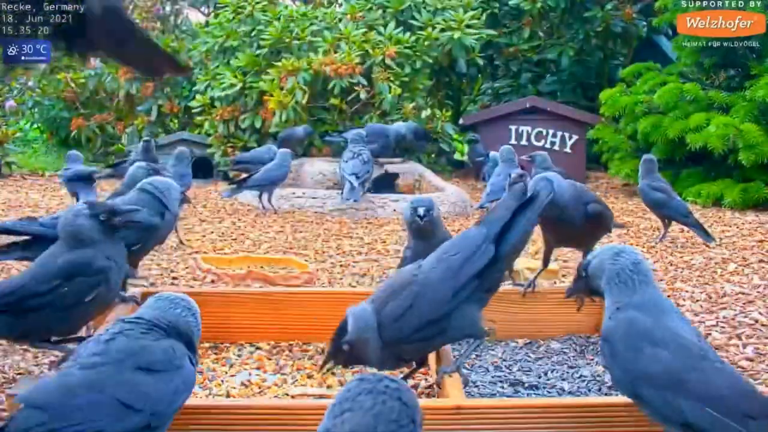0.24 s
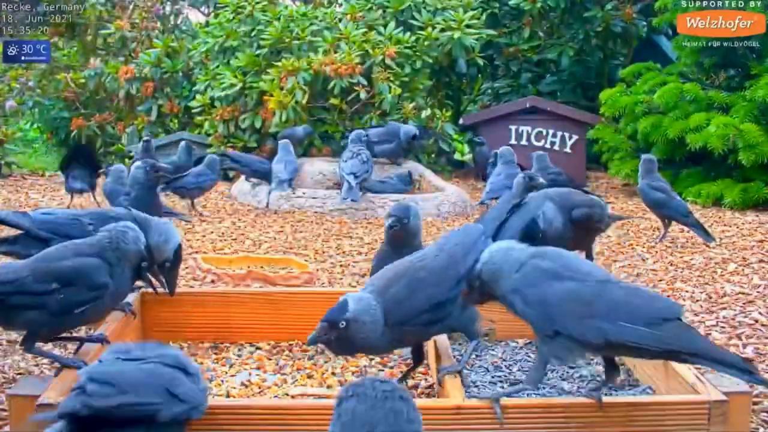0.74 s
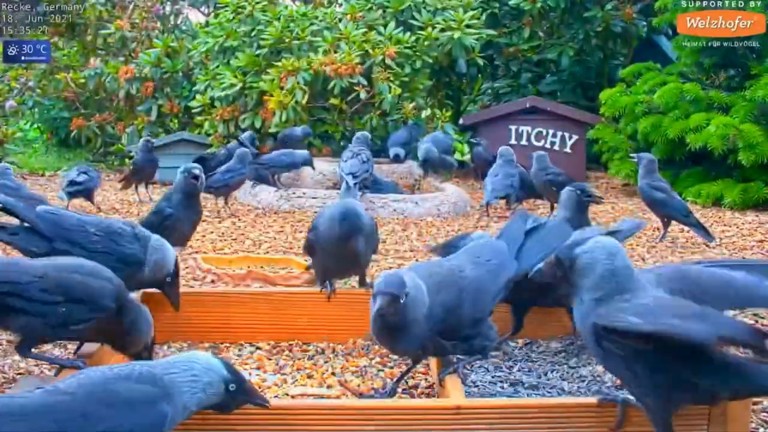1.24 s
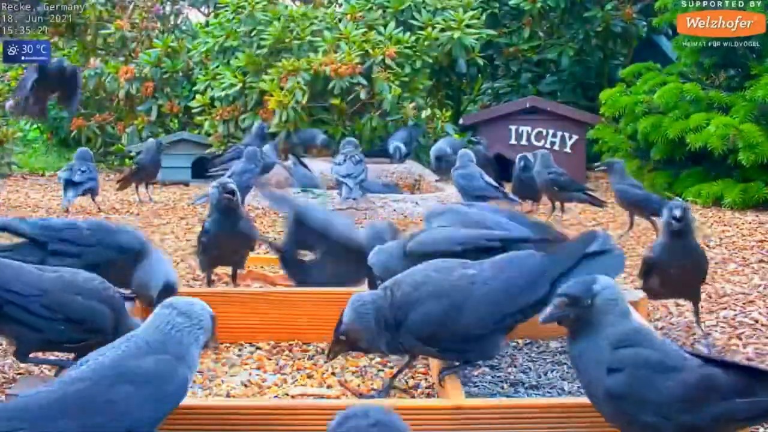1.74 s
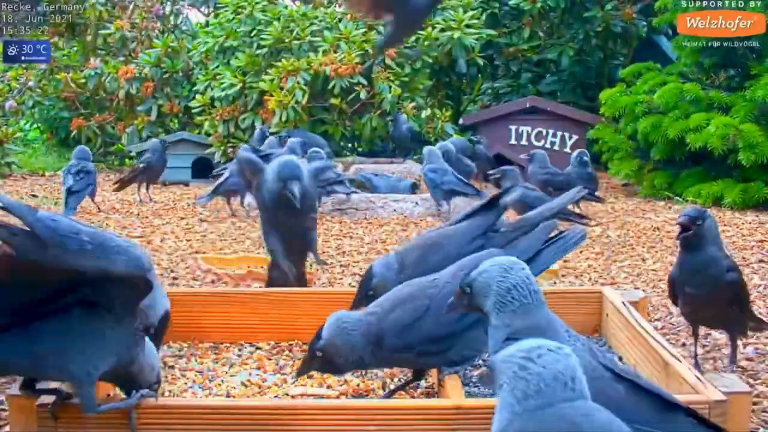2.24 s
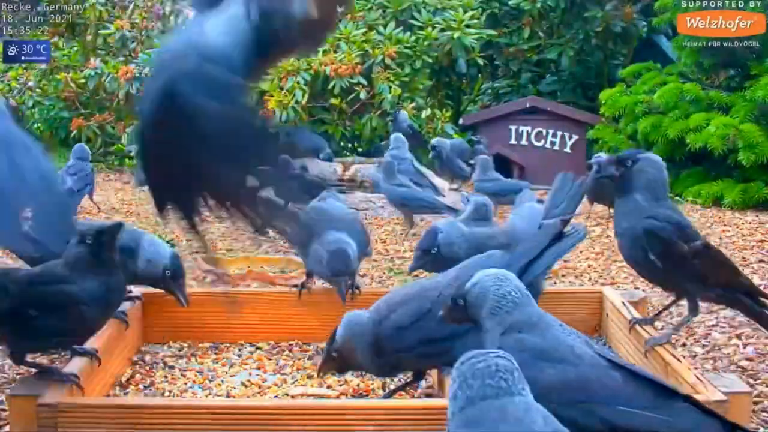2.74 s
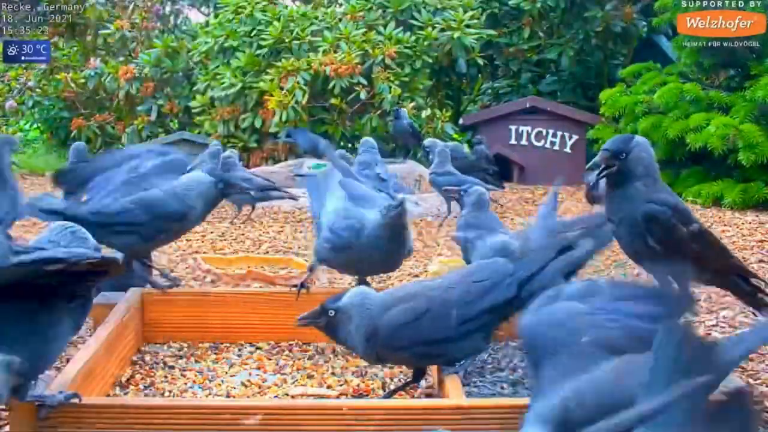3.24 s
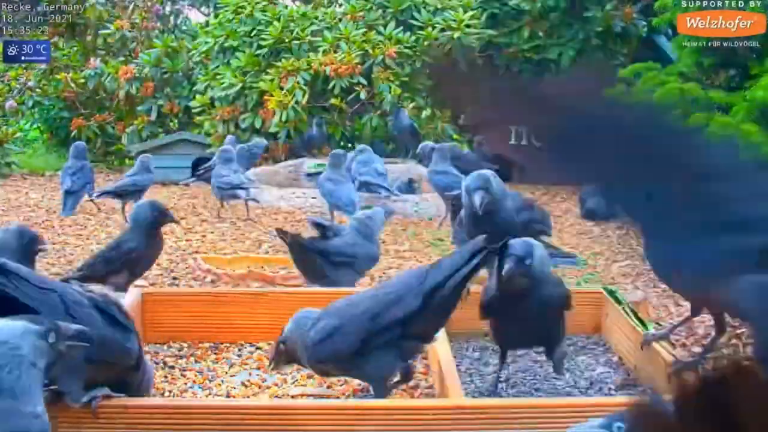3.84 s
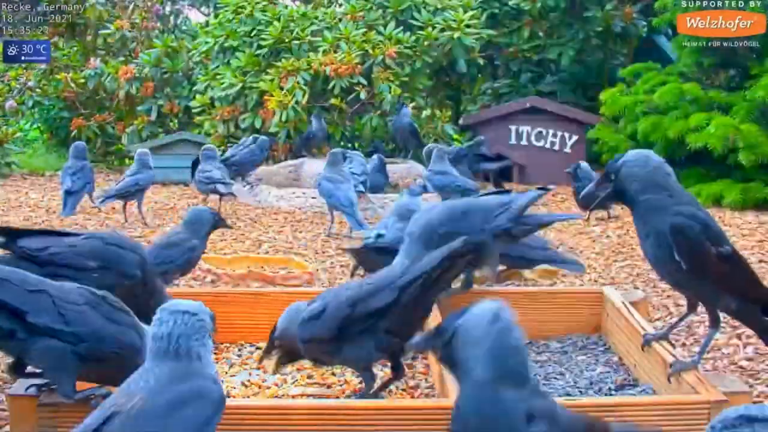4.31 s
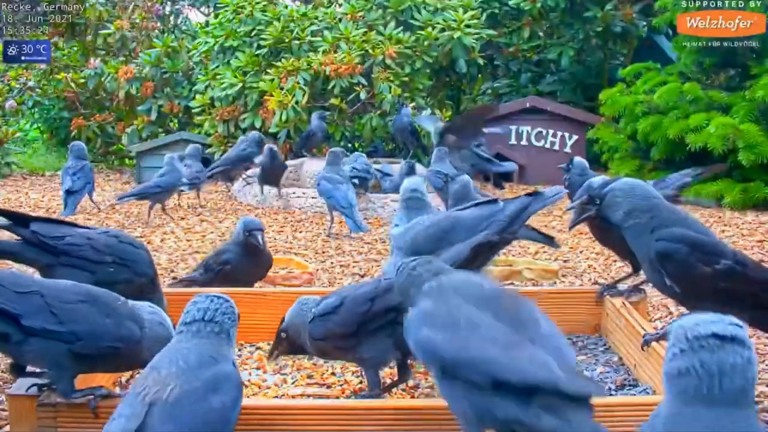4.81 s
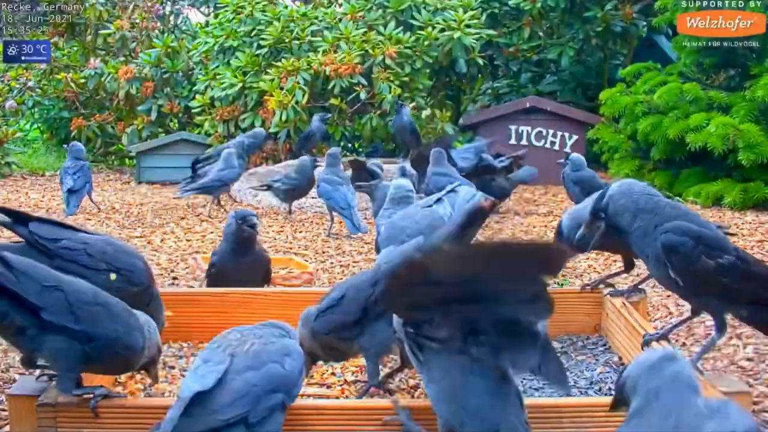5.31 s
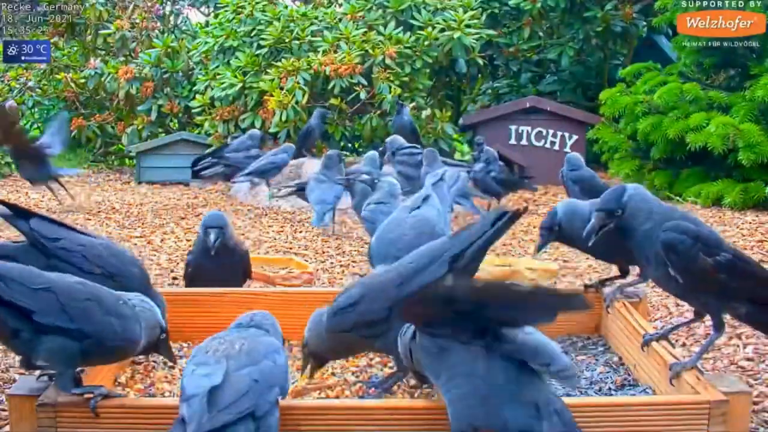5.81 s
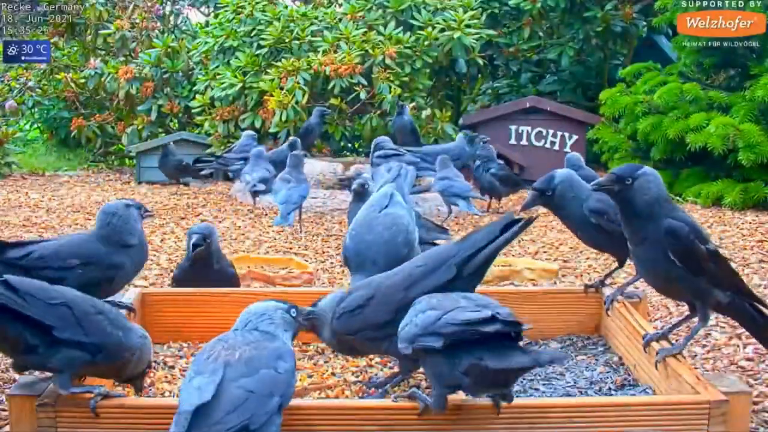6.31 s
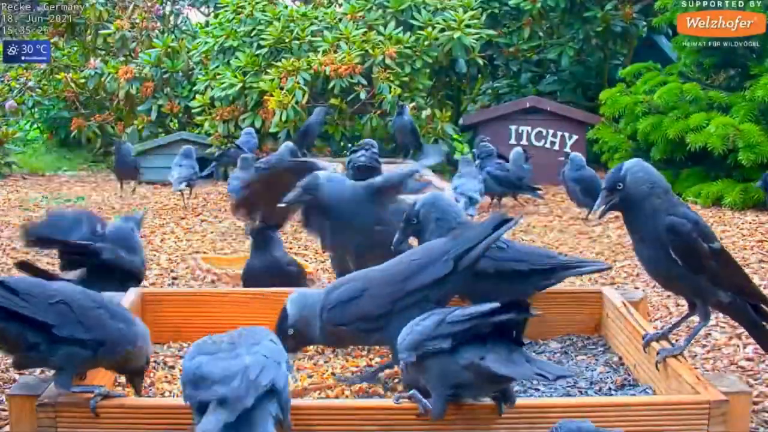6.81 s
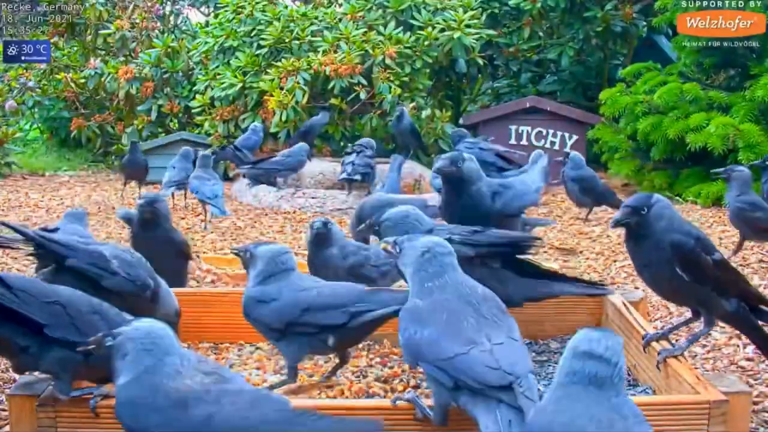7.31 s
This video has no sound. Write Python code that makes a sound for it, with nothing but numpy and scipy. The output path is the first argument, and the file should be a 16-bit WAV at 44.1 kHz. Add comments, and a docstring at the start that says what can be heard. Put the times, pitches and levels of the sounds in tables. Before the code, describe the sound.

Sharp, falling jackdaw calls burst out very close, some distorting, among pecks, scrapes, rattling seed and wing rustle at a wooden tray outdoors.

```python
"""Jackdaws at a feeding tray

Jackdaws crowd a wooden tray in a garden, and their nearest calls overload the microphone.
Each call is a short stack of harmonics, mostly falling, with some roughness and hiss.
Beaks and feet knock, scrape and rattle: short noise bursts and a ringing tray. Noise and small ticks
make the rustle of wings and gravel; gliding tones and narrow noise make the far small birds."""
import sys
import numpy as np
from scipy import signal
from scipy.fft import rfft, irfft, next_fast_len
from scipy.io import wavfile
from scipy.ndimage import uniform_filter1d

SR = 44100
rng = np.random.default_rng(int(sys.argv[2]) if len(sys.argv) > 2 else 0)


def voltage_ratio(decibels):
    """Convert decibels (scalar or array-like) to amplitude ratios, 20 dB per decade."""
    exponent = np.asarray(decibels, float) / 20
    return 10 ** exponent


def unload_wav(signal):
    """Save mono or channel-first audio to the path in sys.argv[1] as 16-bit WAV at rate SR, clipped to [-1, 1]."""
    wavfile.write(
        sys.argv[1],
        SR,
        np.round(np.clip(np.atleast_2d(signal).T, -1, 1) * 32767).astype(np.int16),
    )


N = 332955  # length in samples, about 7.55 s


def band(x, lo_hz, hi_hz):
    """Keep only the sound between two frequencies, scaled to rms 1."""
    y = signal.sosfilt(signal.butter(2, [lo_hz, hi_hz], "band", fs=SR, output="sos"), x)
    return y / np.std(y)


def walk(rate):
    """Wandering curve: random levels held 1 / rate s, smoothed twice, with a spread of 1."""
    hold = int(SR / rate)
    steps = np.repeat(rng.standard_normal(N // hold + 1), hold)
    y = uniform_filter1d(uniform_filter1d(steps, hold), hold)[:N]
    return y / np.std(y)


def grit(per_s, spread_db):
    """Single clicks of unequal size at random moments."""
    size_db = spread_db * np.minimum(rng.exponential(size=N), 3)
    return (rng.random(N) < per_s / SR) * rng.standard_normal(N) * voltage_ratio(size_db)


def add(out, start_s, sound):
    """Mix a sound in at its time."""
    i = int(start_s * SR)
    out[i:i + len(sound)] += sound[:len(out) - i]


# How the mouth colours the harmonics from the fourth up: [f/Hz, relative level/dB]
MOUTH_COLOUR = [(3000, 12), (4300, 5), (5600, 8.5), (7500, -3.5), (9000, -6.5), (15000, -17)]


def throat_and_mouth(hz, phase, throat, high_db, patchy, i):
    """Twelve harmonics: the throat resonance favours the lowest three, the mouth colours the rest."""
    mouth_hz, mouth_db = np.transpose(MOUTH_COLOUR)
    tone = np.zeros(len(i))
    for k in range(1, 13):
        uneven = patchy[i - 2000 * k]  # each harmonic comes and goes at its own moments
        if k <= 3:
            above = np.log2(k * hz / 1000) - throat
            slope_db = np.where(above > 0, 31, 27.5)  # dB per octave above and below the resonance
            away = np.hypot(above, .18) - .18  # octaves away, with a rounded peak
            gain = voltage_ratio(2.5 * uneven - slope_db * away)
        else:
            colour_db = np.interp(np.log(k * hz), np.log(mouth_hz), mouth_db)
            gain = voltage_ratio(high_db + 4 * uneven + colour_db)
        tone += gain * np.sin(k * phase + k * k)
    return tone


# One short curve per call, before a slight waver in pitch; the call at 4.459 s breaks into a low croak,
# which has its own curve from 4.492 s:
# [t/s, f/Hz of the pitch, effort level/dB, throat resonance/octaves above 1 kHz]
CALLS = [
    [(.093, 1003, -13.5, 2), (.106, 1011, -1, 0.75), (.116, 934, 0, 1.36), (.134, 742, -16, 0.43),
     (.16, 586, -28, -1.3)],
    [(.132, 965, -19, .9), (.15, 925, -27, 0.66), (.178, 800, -38, 0.83)],
    [(.773, 934, -0.5, 0.78), (.783, 861, -7.5, 1.04), (.793, 774, -5, 1.4), (.81, 690, -36, 2.3)],
    [(1.066, 1022, 4.5, 0.75), (1.078, 1014, -0.5, 0.84), (1.09, 978, 4.5, 0.82), (1.101, 877, -5, 0.66),
     (1.118, 685, -23, 0.74)],
    [(1.353, 1044, -19, 1.5), (1.366, 1028, -12.5, 1.2), (1.377, 998, -6.5, 1.4), (1.39, 942, -9, 0.51),
     (1.415, 880, -21, 0.47), (1.435, 870, -45, .6)],
    [(1.452, 1020, -39, 1), (1.465, 1120, -31, 0.99), (1.495, 960, -42, 1.2), (1.53, 760, -44, .6)],
    [(3.014, 1243, 5, 1.74), (3.025, 1192, -1, 1.44), (3.036, 1142, 4, 1.68), (3.048, 983, -9, 1.28),
     (3.07, 775, -20, 0.066)],
    [(3.178, 916, -3.5, 1.4), (3.195, 921, -6.5, 1.16), (3.212, 860, -23.5, 0.74)],
    [(3.186, 1080, 0.5, 1.04), (3.198, 1029, 1, 1.18), (3.21, 980, 1, 0.92), (3.222, 871, -2.5, 1.12),
     (3.246, 644, -26, .3)],
    [(3.306, 1122, -4, 1.2), (3.318, 1028, -7, 1.34), (3.329, 952, -7, 1.2), (3.345, 847, -18.5, 1.25),
     (3.385, 660, -28, 0.65)],
    [(3.342, 923, -5, 0.34), (3.353, 871, -9, 0.93), (3.376, 760, -14.5, 1), (3.387, 714, -27, 0.5)],
    [(3.415, 865, -1, 0.76), (3.424, 768, -12, 0.93), (3.433, 700, -6.5, 1.1), (3.44, 686, -24, 1)],
    [(3.44, 1386, 18.5, 0.9), (3.452, 1290, -2.5, 1.55), (3.472, 1100, 12, 0.92), (3.483, 1015, -5, 0.94),
     (3.494, 903, -7, .9), (3.515, 714, -16.5, .5)],
    [(3.476, 1165, -18.5, .2), (3.487, 1244, -4, .3), (3.508, 1050, -22.5, .1)],
    [(3.553, 1162, -1, 1.5), (3.564, 1134, -3, 1.5), (3.574, 1124, -6.5, 1.3), (3.587, 1057, -6, 1.22),
     (3.609, 936, -16, 1.18), (3.632, 730, -27, 0.23)],
    [(3.998, 1338, 2.5, 1.07), (4.008, 1273, 7.5, 1.04), (4.017, 1207, 7, 0.77), (4.029, 1107, 4, 1.05),
     (4.045, 948, -15.5, 0.79), (4.07, 702, -19, 0.12)],
    [(4.269, 1046, -23, 1.6), (4.28, 1040, -14, 1.63), (4.291, 996, -12, 1.6), (4.302, 978, -22, 1.2),
     (4.322, 857, -23, 1.55)],
    [(4.328, 1300, -9, 1.4), (4.339, 1290, -5.5, 0.84), (4.349, 1242, -4.5, 1.1), (4.36, 1178, -13, 0.87),
     (4.371, 1150, -20, 1.38), (4.414, 950, -21.5, 0.43), (4.435, 900, -46, .8)],
    [(4.459, 1240, -3, 0.99), (4.47, 1119, -7, 1.38), (4.482, 1034, -6, 0.95), (4.491, 990, -10, 0.32),
     (4.502, 893, -15, 1.4), (4.525, 787, -24, 1.5)],
    [(4.492, 452, -28, -.3), (4.52, 368, -27.5, -0.15), (4.55, 294, -30, -.3)],
    [(5.045, 1070, -9, 0.87), (5.057, 1033, -17, 1.3), (5.069, 1003, -11.5, 1.67), (5.085, 920, -18, 1.05),
     (5.105, 920, -30.5, 1.33)],
]
# The voice of each curve, in the same order. Levels relative to the effort: the fundamental's at
# mid-call, the higher harmonics' at the start, the half-pitch lines' at the end:
# [attack t/ms, fundamental level/dB, higher harmonics level/dB,
#  roughness level/dB (hiss follows it), half-pitch lines level/dB]
CALL_VOICES = [(6.8, -12, -27.5, -21.5, -14), (4, 0, -31, -18, -14), (6.2, -14, -33.5, -25, -20),
               (4.6, -16, -34.5, -25, -21), (5.7, -6.5, -27.5, -22.5, -11), (6, -26, -32, -22, -20),
               (6.4, -8, -30, -22, -18), (7.4, -4.5, -35.5, -16, -11), (4, -14.5, -28, -17, -14),
               (5.5, -9, -35, -16, -18), (4.1, -1, -21.5, -26, -28), (3.4, -9, -40, -26.5, -10),
               (1.9, -8, -19, -24, -10), (5.06, -15.5, -33, -24, -7.5), (2.4, -5.5, -23.5, -28, -11),
               (2.7, -9, -22, -25.5, -12), (4, -4.5, -12.5, -21, -20), (4.9, -14.5, -30.5, -24, -12),
               (2.4, -22, -19, -8, -11), (8.8, -12, -11.5, -13, -24), (5.7, -5.5, -15.5, -22.5, -13)]


def jackdaws():
    """A moving throat resonance shapes harmonics; turbulent air flutters them and adds hiss."""
    out = np.zeros(N)
    flutter, waver = band(rng.standard_normal(N), 61, 550), walk(250)
    breath, patchy = band(rng.standard_normal(N), 5200, 8000), walk(110)
    release_s = .0033
    for rows, voice in zip(CALLS, CALL_VOICES):
        attack_ms, first_db, high_db, rasp_db, half_db = voice
        s, *columns = np.transpose(rows)
        i = np.arange(int(s[0] * SR), int(s[-1] * SR))
        t = i / SR
        curves = [np.interp(t, s, column) for column in columns]
        hz, effort_db, throat = (uniform_filter1d(c, size=130, mode="nearest") for c in curves)
        phase = 2 * np.pi * np.cumsum(hz * (1 + .013 * waver[i])) / SR
        along = np.linspace(0, 1, len(i))
        high_db = high_db - 5.5 * along  # the call dulls as it goes on
        # the fundamental also sounds by itself, gaining 6 dB over the call
        tone = voltage_ratio(first_db + 6 * (along - .5)) * np.sin(phase + 1)
        tone += throat_and_mouth(hz, phase, throat, high_db, patchy, i)
        # every second cycle weakens toward the end, which puts lines between the harmonics
        doubling = voltage_ratio(half_db) * along ** 2 * np.cos(phase / 2)
        # the voice also roughens toward the end
        hoarse = voltage_ratio(rasp_db) * np.linspace(.5, 2, len(i)) * flutter[i]
        hiss = voltage_ratio(high_db + rasp_db + 15) * breath[i]
        attack = np.clip((t - s[0]) * 1000 / attack_ms, 0, 1) ** 2
        release = np.clip((s[-1] - t) / release_s, 0, 1)
        call = tone * (1 + hoarse + doubling) + hiss
        add(out, s[0], call * voltage_ratio(effort_db) * attack * release)
    return out


# The notes of the wooden tray: [f/Hz, relative level/dB, t/s to fade by 60 dB]
TRAY_NOTES = [(246, -3, 0.11), (329, 9, 0.043), (424, 3, 0.049), (630, 10.5, 0.0073), (950, -24, 0.083)]


def tray_knock(push):
    """Noisy pushes, and claws shifting all the while, set the notes of the tray ringing."""
    t = np.arange(int(.15 * SR)) / SR
    ring = sum(voltage_ratio(db) * np.sin(2 * np.pi * hz * t) * 1000 ** (-t / t60) for hz, db, t60 in TRAY_NOTES)
    ring = ring / np.sqrt(np.sum(ring ** 2))
    claws = voltage_ratio(-29) * grit(110, 3.44)  # 110 clicks a second on average
    knock = signal.fftconvolve(push * rng.standard_normal(N) + claws, ring)[:N]
    # the knocks carry nothing below about 150 Hz
    knock = signal.sosfilt(signal.butter(3, 150, "high", fs=SR, output="sos"), knock)
    return voltage_ratio(2.5) * knock


# Pecks, steps and wing brushes: [t/s, time scale t/ms, level/dB before the boost for long ones,
# lightness (about 0 knocks the tray, 1 scrapes it, 2 rattles seed)]
CONTACTS = [(.211, 8.1, -27.5, 1), (.276, 1.75, -19, 2), (.318, 16, -30, 3.1), (.341, 33, -36, 1.4),
            (0.59, 19, -24.5, 2.12), (0.706, 9.3, -36.5, -0.2), (0.84, 14, -34.5, 1.1),
            (0.922, 8.4, -29.5, 1.5), (.956, 9.7, -24, 3.1), (.979, 11.2, -26.5, 1.2), (1.054, 8.4, -20, 3),
            (1.249, 3.3, -23, 2.4), (1.422, 17.5, -31, 1.4), (1.565, 17, -35.5, 2),
            (1.64, 17.4, -31.5, 1.14), (1.768, 5.5, -30.5, 2.5), (1.797, 10.5, -28, 2.1),
            (1.84, 15, -36, 1), (1.952, 21, -34, 1.3), (2.094, 11, -33, 1.1), (2.126, 15, -31, 1.3),
            (2.27, 7.6, -29, 2), (2.34, 6.9, -29, 2.45), (2.352, 21, -38.5, 1.5), (2.405, 12.8, -26.5, 0.4),
            (2.51, 11, -34, 1.3), (2.553, 21, -24.5, 3.1), (2.665, 6.6, -22.5, 2.64),
            (2.714, 24.4, -28.5, 1.6), (2.844, 6.3, -16.5, 2.2), (2.854, 26, -14, 3.3),
            (2.883, 6.5, -36.5, 1.5), (2.913, 28, -24.5, 2.7), (3.093, 18, -15.5, 3),
            (3.635, 20, -36.5, 0.3), (3.802, 11, -42, 0.2), (3.859, 13, -27, 0.56), (3.939, 18, -27.5, 1.4),
            (4.205, 8, -31.5, 3), (4.219, 9.3, -34, -0.5), (4.58, 9, -36, 1.5), (4.664, 14.4, -24, 1.2),
            (4.76, 14.5, -27, 3), (4.848, 29, -39, 2), (5.137, 7.8, -33, 1.2), (5.226, 20, -29, 1.8),
            (5.292, 12, -30, 0.05), (5.364, 25, -34.5, 2), (5.464, 16.3, -34.5, 1.1),
            (5.478, 20.3, -25, 1.5), (5.568, 20, -40.5, 0.4), (5.634, 16.3, -33.5, 1.4),
            (5.845, 7.8, -23, 2), (5.872, 12, -29.5, 3.1), (5.907, 7.6, -32.5, 1.1),
            (5.938, 15.4, -30.5, 1.5), (6.091, 13, -35.5, 1.0), (6.129, 24, -31.5, 2),
            (6.196, 12, -36, 0.1), (6.296, 19, -40, 2), (6.336, 9.2, -26.5, 0.4), (6.513, 8.8, -34.5, 2),
            (6.578, 16, -38.5, 1), (6.658, 21, -41.5, 0.8), (6.73, 7.8, -32.5, -0.7),
            (6.818, 24, -32.5, 2.5), (7.052, 28, -33, 1.74), (7.124, 22, -21.5, 3.5),
            (7.213, 16.3, -16, -0.17), (7.219, 5.1, -20, 1.5), (7.275, 15.5, -25, 2.7),
            (7.285, 34, -37, -0.9), (7.354, 5.4, -20.5, 3)]
# Loss of knock, scrape and rattle one step of lightness away, growing with the square: [level/dB]
LIGHTNESS_LOSS = [5.5, 13.5, 12]


def scuffle():
    """Short contacts snap on, long brushes swell; each pushes the tray, scrapes it and shakes seed."""
    push, scrape, rattle = np.zeros((3, N))
    grains = rng.standard_normal(N) + 2.34 * grit(2500, 5.6)
    for s, ms, db, lightness in CONTACTS:
        t = np.arange(0, 4, 1000 / (ms * SR))  # time in units of the contact's own time scale
        rise = 1 - np.exp(-(t / (.039 + ms / 45)) ** 2)
        shape = rise * np.exp(-t / .56) * (2 + ms / 9)
        # lighter scrapes ring higher; each reaches .87 octave to either side
        centre_hz = 1390 * 2 ** (.37 * (np.clip(lightness, 0, 2) - 1))
        lo_hz, hi_hz = centre_hz * 2 ** (.87 * np.array([-1, 1]))
        # the first 2000 samples let the filter settle
        rub = band(np.resize(grains[int(s * SR):], len(t) + 2000), lo_hz, hi_hz)[2000:]
        layers = [(push, shape), (scrape, shape * rub), (rattle, shape)]
        for step, (out, sound) in enumerate(layers):
            loss_db = LIGHTNESS_LOSS[step] * (step - lightness) ** 2
            add(out, s, voltage_ratio(db - loss_db) * sound)
    return tray_knock(push) + scrape + rattle * band(grains, 3400, 12500)


# Beaks tapping hard seed or wood: [t/s, relative level/dB, f/Hz of the lower note]
TAPS = [(0.85, -27, 617), (1.644, -25, 770), (1.954, -20.5, 690), (2.512, -16.5, 2180), (2.614, -25, 3370),
        (2.651, -23, 1750), (2.722, -18.5, 670), (4.581, -21, 1650), (4.729, -29, 3390), (5.296, -25, 775),
        (5.574, -34, 608), (5.645, -19.5, 1290), (5.694, -23.5, 3210), (5.907, -35, 2270),
        (5.942, -26, 1870), (6.093, -12, 1400)]


def pecks():
    """Each tap rings two close notes for a moment, the upper one weaker."""
    out, t = np.zeros(N), np.arange(int(.06 * SR)) / SR
    rise_s, t60_s = .0015, .025
    for (s, db, hz), turn in zip(TAPS, rng.random(len(TAPS))):
        pair = np.sin(2 * np.pi * hz * t) + .25 * np.sin(2 * np.pi * (1.2 * hz * t + turn))
        add(out, s, voltage_ratio(db - 1) * pair * (1 - np.exp(-t / rise_s)) * 1000 ** (-t / t60_s))
    return out


# How loud the flock bustles: [t/s, seed and feather relative level/dB,
# weight of wings and feet relative to it, level/dB]
FLOCK_BUSTLE = [(0.0, -42, -2), (.2, -39.5, 6.5), (.42, -46.5, -3), (.62, -43.5, -10.5), (1.2, -43, -5.5),
                (1.42, -42.5, -4.5), (2.0, -41.5, -8), (2.45, -45, 2.5), (2.8, -40, -1), (3.0, -40, 6),
                (3.2, -35.5, -7.5), (3.6, -35, -3.5), (3.85, -39.5, -5.5), (4.2, -41.5, -3.5),
                (4.6, -42, -6.5), (4.8, -43.5, -14.5), (5.0, -47.5, 1), (5.4, -43.5, -2),
                (5.8, -46.5, -5.5), (6.0, -46, 2), (6.5, -46, -4.5), (7.0, -43, -2), (7.2, -40.5, -7.5),
                (7.5, -41, -7)]
# Overall colour of the rustle: [f/Hz, relative level/dB]
RUSTLE_COLOUR = [(18, -48), (30, -16), (97, -13), (260, -1.5), (490, -4.5), (770, -0.5), (1600, -10.5),
                 (3400, -7), (8800, -9), (15600, -15.5)]


def bustle():
    """Noise and grit in overlapping bands flicker together and also alone; seeds tick on top."""
    s, *columns = np.transpose(FLOCK_BUSTLE)
    high_db, weight_db = (np.interp(np.arange(N) / SR, s, c) for c in columns)
    low_db = high_db + weight_db
    mid_db = low_db - 3  # gravel follows the weight of wings and feet
    hzs, dbs = np.transpose(RUSTLE_COLOUR)
    size = next_fast_len(N)
    octave = np.log2(np.arange(1, size // 2 + 2) * SR / size)
    colour = voltage_ratio(np.interp(octave, np.log2(hzs), dbs))
    together, out = walk(90), 0
    levels_db = [low_db + 14, low_db + 15.5, mid_db + 18,
                 (mid_db + high_db) / 2 + 17, high_db + 11.5, high_db + 13.5]
    # band centres as log2 of Hz, about 90 Hz to 16 kHz
    for centre, db in zip(np.arange(6.5, 15, 1.5), levels_db):
        grain = rng.standard_normal(N) + 1.76 * grit(590, 5.46)
        share = np.sqrt(np.clip(1 - abs(np.maximum(octave, 6.5) - centre) / 1.5, 0, 1))
        part = irfft(rfft(grain / np.std(grain), size) * colour * share, size)[:N]
        out = out + part * voltage_ratio(db + 1.76 * together + 2.54 * walk(60))
    return out + seeds(high_db)


def seeds(level_db):
    """Seeds and gravel tick at random: each a burst of up to a few ms with its own pitch and size."""
    out = np.zeros(N)
    for when, pitch, length, size in rng.random((900, 4)):
        t = np.arange(int((.00075 + .0068 * length ** 2) * SR)) / SR
        hz = 900 * 16 ** pitch
        burst = band(rng.standard_normal(len(t)), hz / 1.25, hz * 1.25) * np.exp(-3 * t / t[-1])
        size_db = -8 - 3.5 * np.log(size + .02)  # few are loud, most are faint
        add(out, when * N / SR, voltage_ratio(level_db[int(when * N)] + size_db) * burst)
    return out


# Far songbirds, before a quick random swell and a slight waver:
# [start t/s, end t/s, first f/Hz, last f/Hz, level/dB]
FAR_WHISTLES = [(.41, 0.47, 5400, 5300, -47), (.625, .655, 5200, 4900, -48), (.64, .67, 2640, 2600, -42),
                (1.886, 1.944, 3740, 3400, -39.5), (1.978, 2.098, 5450, 5400, -53),
                (1.515, 1.553, 2400, 2100, -40), (1.554, 1.578, 2630, 2400, -39),
                (2.222, 2.264, 4750, 4750, -44), (5.22, 5.26, 5450, 5400, -48),
                (2.67, 2.793, 5300, 5850, -43), (2.915, 3.097, 8930, 7440, -34.5),
                (4.65, 4.683, 3700, 3600, -52), (4.688, 4.75, 3470, 3340, -44),
                (4.786, 4.865, 3280, 3260, -47), (5.14, 5.208, 5800, 5170, -51),
                (6.93, 6.973, 5000, 5200, -52), (7.085, 7.125, 5070, 4870, -41)]


def songbirds():
    """Thin gliding tones that waver, swell and fade; fainter ones come at random."""
    out, waver = np.zeros(N), walk(97)
    faint = []
    for when, length, pitch, glide in rng.random((30, 4)):
        start, first_hz = 7.4 * when, 2500 + 3200 * pitch
        faint.append((start, start + .03 + .03 * length, first_hz, first_hz * (1.04 - .16 * glide), -56))
    for start, end, first_hz, last_hz, db in list(FAR_WHISTLES) + faint:
        i = np.arange(int(start * SR), int(end * SR))
        hz = np.linspace(first_hz, last_hz, len(i)) * (1 + .008 * waver[i])
        tone = np.sin(2 * np.pi * np.cumsum(hz) / SR)
        add(out, start, voltage_ratio(db) * tone * signal.windows.tukey(len(hz), .4))
    return out * voltage_ratio(2 * walk(70))


# Far buzzy chirps: [start t/s, end t/s, middle f/Hz, level/dB]
FAR_CHIRRS = [(0.798, .9, 4000, -47), (1.862, 1.917, 2500, -46), (1.964, 2.049, 3740, -42.5),
              (5.5, 5.56, 3320, -50), (6.057, 6.149, 2790, -45.5), (6.066, 6.154, 4860, -45.5),
              (6.448, 6.6, 4130, -51)]


def chirrs():
    """Rough bands of noise, 300 Hz wide, that swell and fade."""
    out = np.zeros(N)
    for start, end, hz, db in FAR_CHIRRS:
        buzz = band(rng.standard_normal(N // 20), hz - 150, hz + 150)
        buzz = buzz[-int((end - start) * SR):]
        add(out, start, voltage_ratio(db) * buzz * signal.windows.tukey(len(buzz), .5))
    return out


def yard_echo(near):
    """A short random scatter of echoes from shrubs and fence, starting after 8 ms."""
    t60_s, level_db = .08, -33
    t = np.arange(int(.3 * SR)) / SR
    echoes = band(rng.standard_normal(len(t)), 560, 3300) * 1000 ** (-t / t60_s) * (t > .008)
    echoes = echoes / np.sqrt(np.sum(echoes ** 2))
    return voltage_ratio(level_db) * signal.fftconvolve(near, echoes)[:N]


def scene():
    """The near sounds with their echoes, then the rustle and the far birds."""
    near = jackdaws() + scuffle() + pecks()
    mix = near + yard_echo(near) + bustle() + songbirds() + chirrs()
    return mix[None]  # one channel


def roll_off(x):
    """The treble ends steeply here."""
    return signal.sosfilt(signal.butter(12, 15790, fs=SR, output="sos"), x)


def record(dry):
    """The microphone drops the deep bass; the input clips at full scale; the top is cut."""
    x = signal.sosfilt(signal.butter(1, 40, "high", fs=SR, output="sos"), dry)
    x = np.clip(x, -1, 1)
    x = signal.sosfilt(signal.ellip(10, .2, 70, 15800, fs=SR, output="sos"), x)
    return roll_off(x)


dry = scene()
out = record(dry)
unload_wav(out)
```